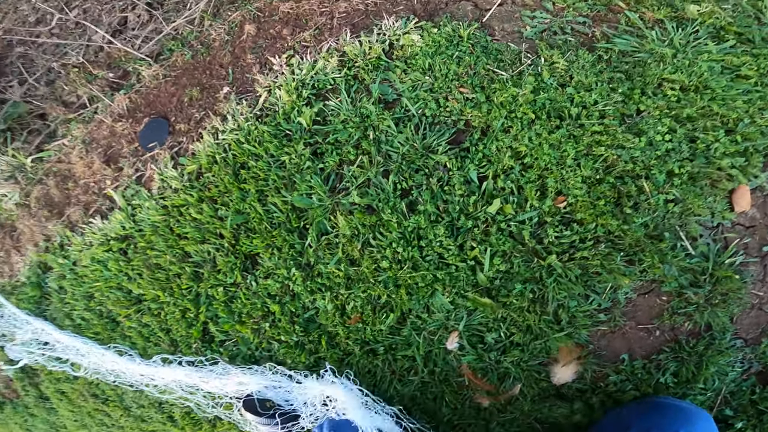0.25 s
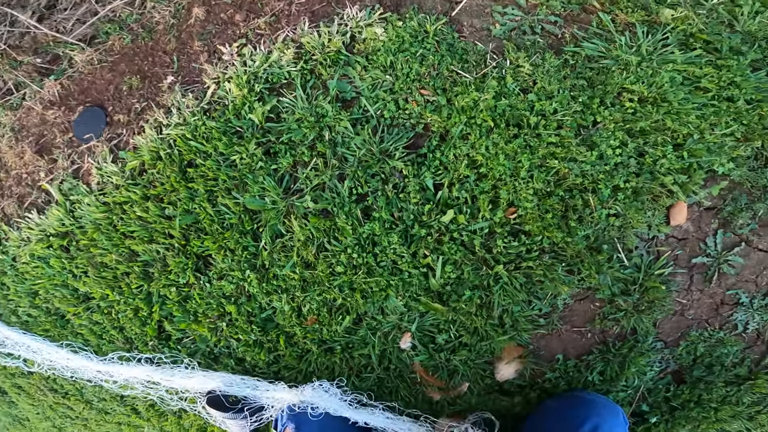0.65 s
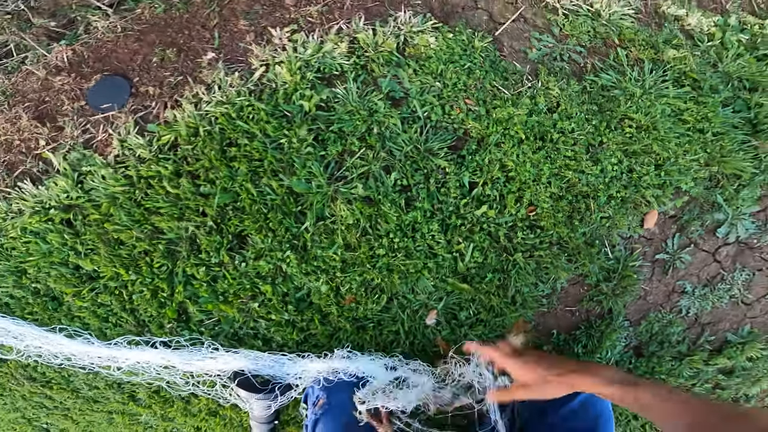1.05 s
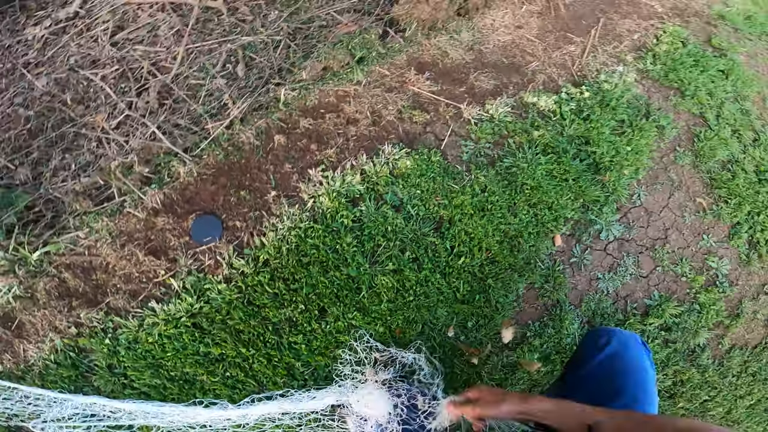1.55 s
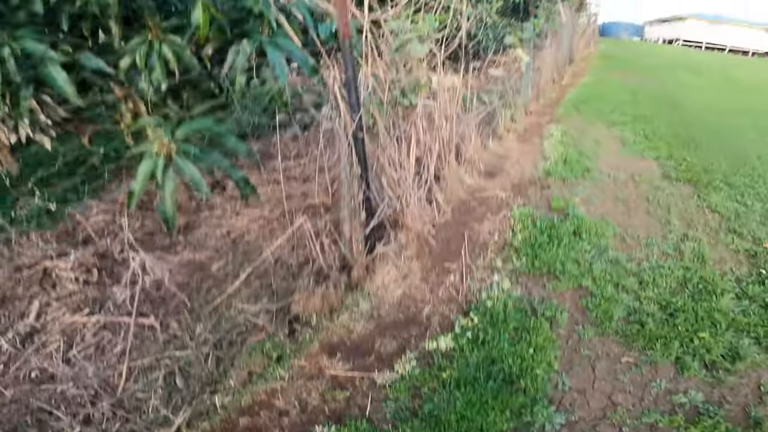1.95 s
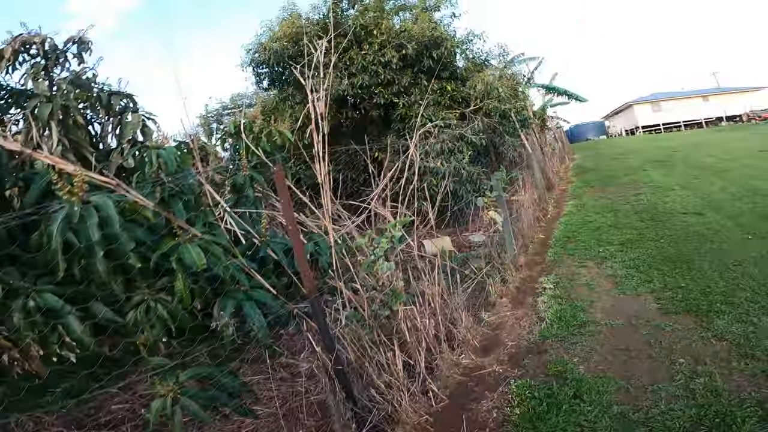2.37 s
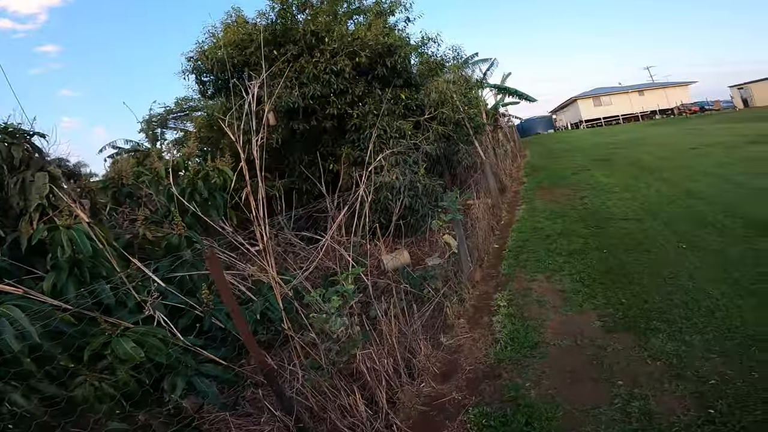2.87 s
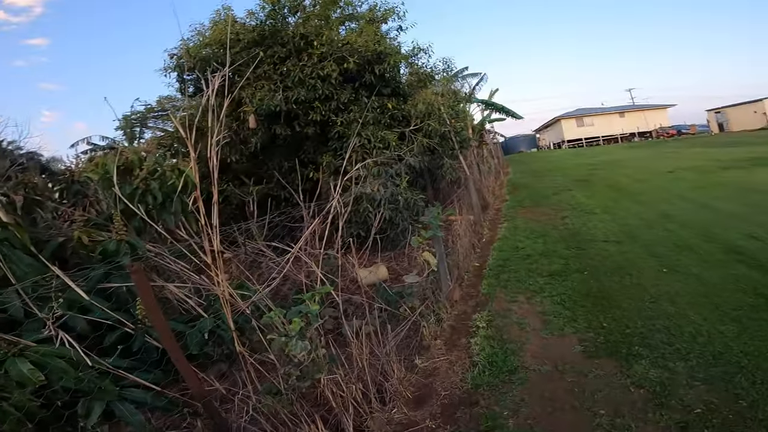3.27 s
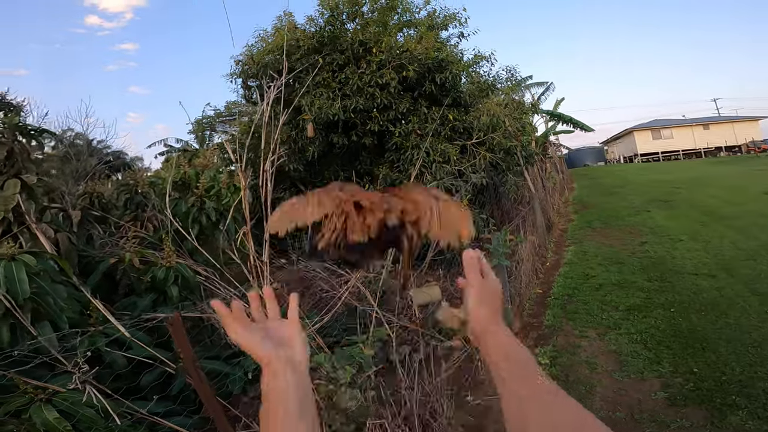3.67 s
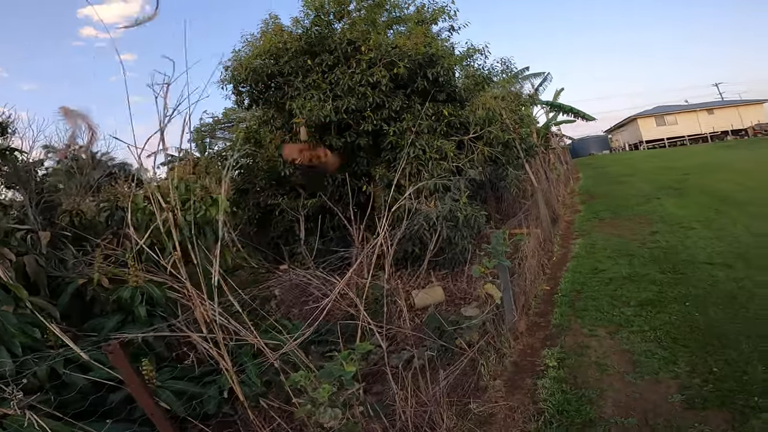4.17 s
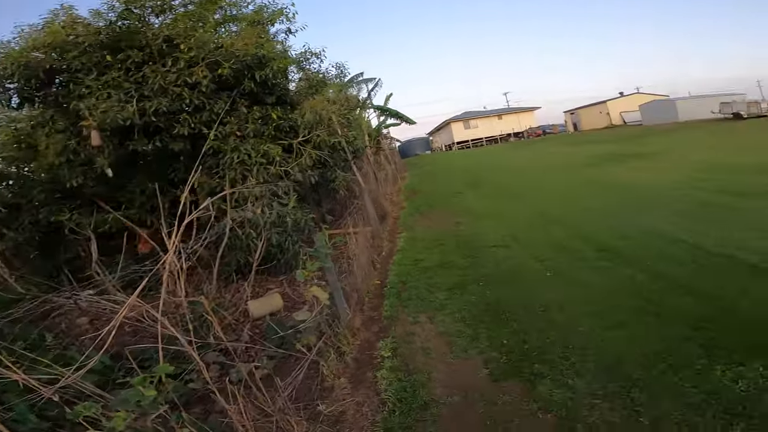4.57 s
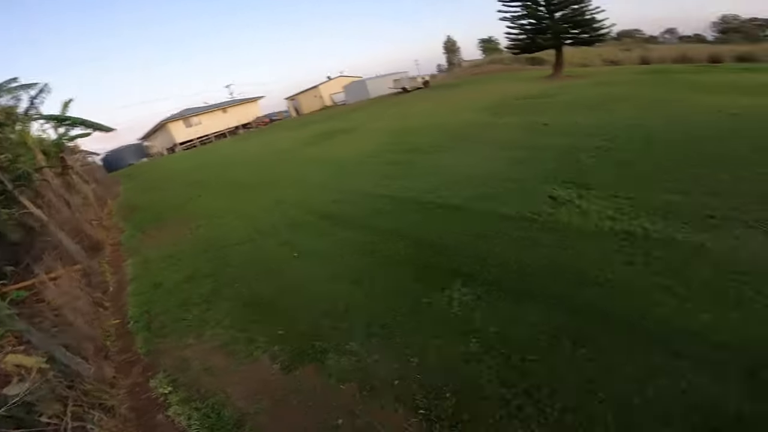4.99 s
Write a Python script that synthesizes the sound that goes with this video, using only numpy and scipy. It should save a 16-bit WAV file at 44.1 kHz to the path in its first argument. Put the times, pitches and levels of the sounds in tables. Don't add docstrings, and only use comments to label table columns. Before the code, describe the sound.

A hen held close squawks and shrieks up to a scream amid rustling and bumps, then is thrown, clucking off with snapping twigs and wingbeats.

```python
import sys
import numpy as np
from scipy import signal
from scipy.fft import rfft, irfft, next_fast_len
from scipy.io import wavfile
from scipy.ndimage import uniform_filter1d

SR = 44100
rng = np.random.default_rng(int(sys.argv[2]) if len(sys.argv) > 2 else 0)


def elevation(decibels):
    levels = np.asarray(decibels, float)
    return 10 ** (levels / 20)


def int16_out(signal):
    q = np.round(np.clip(np.atleast_2d(signal).T, -1, 1) * 32767)
    wavfile.write(sys.argv[1], SR, q.astype(np.int16))


N = 230907

# pitch_hz, level_db (per Hz)
AIR_COLOUR = [(90, -40), (150, -4), (760, -5.5), (1090, 1), (2700, -7), (3700, -9.5), (4400, -16.5),
              (8000, -21.5), (12500, -34.5), (16000, -54)]
# pitch_hz, level_db
MACHINE_WHINE = [(2229, -76), (2670, -70), (3117, -79), (3564, -64), (4011, -69)]
# pitch_hz, likeness (0-1)
PORT_LIKENESS = [(60, 1), (240, 0.98), (950, 0.83), (3770, 0.45), (15000, 0.1)]
# pitch_hz, left_right_db
PORT_LEVEL = [(60, -23), (180, -8), (550, -5.5), (1650, -2.5), (4970, -4), (15000, -19)]
# pitch_hz, lead_radians
PORT_LEAD_ANGLE = [(100, 0.071), (500, -0.054), (1200, -0.016), (2400, -1.09), (5000, -0.54), (10000, -1.1)]
# peak_s, level_db, upper_part_db (relative), rise_s, fall_s
GUSTS = [(0.08, -37.5, 6.5, 0.085, 0.17), (0.379, -45, -9, 0.17, 0.069), (0.951, -35.5, -4, 0.14, 0.029),
         (1.62, -61.5, -50, 0.69, 0.14), (2.02, -22.5, -15.5, 0.053, 0.094), (2.13, -36, -21, 0.063, 0.2),
         (2.3, -56, 5.5, 0.25, 0.052), (2.569, -39, -24, 0.049, 0.15), (3.134, -60.5, 13, 0.19, 0.024),
         (3.975, -32.5, -6, 0.096, 0.38), (4.526, -34, -22, 0.24, 0.78), (5.235, -46, -1, 0.48, 0.38)]
# peak_s, level_db, low_part_db (relative), rise_s, fall_s
RUBS = [(0.074, -43.5, 9, 0.074, 0.031), (0.298, -66, -3, 0.09, 0.32), (.61, -65, -26, 0.16, 0.15),
        (.87, -67, 23, 0.026, 0.052), (1.1, -64.5, -5, 0.11, 0.17), (1.76, -60.5, -22, 0.19, 0.11),
        (1.941, -65, -12, 0.05, 0.089), (3.47, -65.5, 8, 0.04, 0.064), (3.748, -51.5, -12.5, 0.11, 0.05),
        (3.888, -55.5, 12, 0.016, 0.6), (4.04, -48, -8, 0.12, 0.17), (4.25, -63, -1, 0.12, 1),
        (4.624, -49.5, 7, 0.011, 0.1), (4.902, -60.5, 10, 0.074, 0.18), (5.029, -41.5, -35, 0.015, 0.082),
        (5.145, -44.5, -5.5, 0.036, 0.16), (5.21, -60, -16, 0.15, .2)]
# pitch_hz, level_db (per Hz)
RUB_COLOUR = [(120, -31), (200, -7), (558, -18), (696, -20), (968, -15.5), (2420, -22), (3970, -20),
              (8740, -30), (12600, -43), (16000, -45.5)]

# time_s, effort_db, pitch_hz
HELD_SQUAWKS = [
    [(0.028, -33, 435), (0.05, -24, 477), (0.072, -12.5, 490.4), (0.08, -15.5, 604), (0.1, -15, 661),
     (0.115, -16, 757), (0.135, -27, 745)],
    [(0.128, -35, 713), (0.15, -24.5, 720.6), (0.178, -31, 718.6), (0.19, -21.5, 690), (0.21, -18.5, 595),
     (0.222, -13, 604), (0.258, -23, 587), (0.273, -17.5, 544), (0.284, -69, 577)],
    [(0.703, -28.5, 290.2), (0.76, -20, 487.5), (0.806, -18, 562), (0.92, -18, 599.4), (0.99, -18.5, 566.3),
     (1.014, -15, 522), (1.025, -21.5, 420), (1.04, -23, 390), (1.05, -50, 350)],
]
# time_s, effort_db, pitch_hz
HELD_SHRIEKS = [
    [(1.418, -27, 320), (1.445, -19.5, 397.5), (1.482, -17, 427.7), (1.488, -19, 615.7),
     (1.545, -16.5, 656), (1.551, -18.5, 764), (1.64, -19, 773), (1.644, -19.5, 398.5), (1.691, -24, 382)],
    [(2.183, -36.5, 244.5), (2.22, -24.5, 347.7), (2.245, -33, 387), (2.258, -28, 427.3),
     (2.33, -24.5, 468), (2.336, -23, 592.6), (2.39, -21.5, 670), (2.51, -24.5, 567.6), (2.55, -42, 481)],
    [(3.01, -27.5, 291), (3.03, -18.5, 356.5), (3.062, -14.5, 428), (3.075, -19.5, 532),
     (3.1, -20.5, 565.5), (3.129, -12.5, 586)],
]
# time_s, effort_db, pitch_hz
CLEAR_SCREAM = [
    (3.122, -21, 550.5),
    (3.17, -19, 576),
    (3.215, -20, 608),
    (3.255, -19, 610),
    (3.3, -20.5, 596.4),
    (3.342, -21.5, 590.5),
]
# time_s, effort_db, pitch_hz
BROKEN_RASP = [
    (3.333, -17.5, 596.5),
    (3.345, -17, 628),
    (3.368, -21.5, 619.7),
    (3.377, -15, 612),
    (3.384, -21.5, 598.6),
    (3.407, -18, 607),
    (3.416, -21.5, 570),
    (3.446, -21.5, 469),
    (3.465, -36.5, 430),
]
# time_s, effort_db, pitch_hz
THROWN_CRY = [
    (3.857, -31, 363),
    (3.905, -19.5, 381.5),
    (3.922, -20.5, 515),
    (3.945, -18, 466),
    (3.957, -25.5, 408),
    (3.978, -21, 507.5),
    (4.022, -18, 486),
    (4.055, -25.5, 507.5),
    (4.074, -40, 490),
]
# time_s, effort_db, pitch_hz
FLIGHT_CLUCKS = [
    [(4.08, -36, 483), (4.092, -22, 489), (4.127, -13.5, 562.4), (4.138, -20, 598), (4.156, -19, 511),
     (4.18, -42, 485)],
    [(4.224, -41, 370), (4.236, -29.5, 388.5), (4.255, -26, 492), (4.282, -25.5, 510), (4.297, -56, 497)],
    [(4.458, -39, 401), (4.478, -35.5, 455), (4.492, -22, 497), (4.512, -43, 495)],
    [(4.672, -51, 398), (4.688, -27, 453.6), (4.703, -21.5, 498), (4.72, -38, 492)],
    [(4.86, -57, 327), (4.878, -40, 476), (4.894, -18, 537), (4.9, -25.5, 548), (4.906, -25.5, 566),
     (4.93, -33.5, 470), (4.945, -44, 440)],
    [(4.98, -29, 419), (4.998, -34.5, 516.6), (5.008, -21.5, 554), (5.025, -26.5, 487), (5.037, -50, 470)],
]
# left_right_db, beak_hz, brightness_db, lower_windpipe_db, sizzle_db
CRY_PLACE = [(6.5, 1320, -20, 8.5, -28), (6, 1276, -14, 8.5, -3), (6, 1543, -7.5, 8, 2),
             (6, 1450, -14, 10, -3), (9.5, 1407, -10, 8, -5.5), (5, 1350, -6.5, 3, -5),
             (5, 1370, -2.5, 5.5, -1.5), (4.5, 1310, -10.5, 1.5, -4), (5.5, 1188, -18.5, -7, -21),
             (4.5, 1224, -17.5, -0.5, -3.5), (4.5, 1196, -14, -1, -17), (5.5, 1160, -13, -8, -5),
             (7, 1180, -16, -18, -5), (9, 1260, -22, -15, 9), (9, 1090, -24, -26, 24)]
# chest_db, whistle_db, beak_width_hz, hoarse_beak_ring (share), shut_beak_db
CRY_THROAT = [(-4, -14, 660, 0.47, -4), (-5, -5, 690, 0.74, -4.5), (-4.5, -20.5, 920, 1, -39),
              (-10, -12, 560, 0.84, -3), (-6.5, -6, 550, 0.76, -0.5), (-9, -3, 430, 1.2, -10),
              (-7.5, -7, 900, 1.8, 1.5), (-9.5, -1.5, 450, 0.65, 6.5), (-14, -3, 330, 0.31, -5),
              (-15, -11, 310, 0.23, -13), (-30, -6, 260, 0.3, -11), (-13, -9, 350, 0.39, 16),
              (-25, 0, 270, 0.2, 5), (-14, -3, 260, 0.43, -3), (-34, -10, 440, 0.33, -9)]
# start_s, end_s, roughness (0-1)
CLEAR_SPELLS = [(.04, .07, .2), (.07, .122, .5), (.186, .226, .45), (.226, .254, .04), (.254, .29, .55),
                (.7, .74, .25), (.74, .808, .45), (.808, 1.018, .12), (1.018, 1.05, .45), (1.41, 1.49, .48),
                (1.49, 1.546, .3), (1.546, 1.64, .5), (1.645, 1.7, .5), (2.18, 2.24, .3), (2.24, 2.33, .42),
                (2.34, 2.48, .48), (3.0, 3.062, .42), (2.48, 2.53, .4), (3.128, 3.15, .34),
                (3.15, 3.212, .2), (3.212, 3.25, .12), (3.25, 3.336, .01), (3.336, 3.47, .55),
                (3.062, 3.128, .55), (3.85, 3.92, .16), (3.92, 3.975, .25), (3.975, 4.035, .1),
                (4.075, 4.11, .18), (4.22, 4.25, .25), (4.11, 4.13, .45), (4.25, 4.875, .52),
                (4.875, 4.9, .28), (4.9, 5.1, .5)]
# start_s, end_s, share
PAIRED_SPELLS = [
    (.74, 1.0, .13),
    (1.49, 1.546, .22),
    (1.546, 1.64, .5),
    (2.34, 2.48, .32),
]
# pitch_hz, width_hz, level_db
LOWER_WINDPIPE = [(2487, 650, -6), (3072, 116, -5.5)]
# pitch_hz, width_hz, level_db
MAIN_WINDPIPE = [(3548, 685, 0.02)]
# pitch_hz, width_hz, level_db
SIZZLE_MODES = [(6420, 1830, -10.5), (9060, 330, -16.5), (10400, 1800, -27)]

# start_s, peak_db, pitch_hz
BODY_THUMPS = [
    (0.067, -19.5, 73.5),
    (0.072, -14, 193),
    (0.147, -23, 91),
    (0.152, -24.5, 241),
    (0.257, -24.5, 111.4),
    (0.88, -33.5, 200),
    (0.935, -30.5, 104),
    (4.54, -32, 58),
    (4.63, -33, 86),
]
# start_s, peak_db, pitch_hz
NET_TAPS = [
    (0.446, -43, 1180),
    (0.532, -39, 1426),
    (0.632, -36.5, 850),
    (1.938, -47, 467),
]
# time_s, level_db, pitch_hz
FAR_CALL = [
    (1.142, -52, 536),
    (1.316, -54.5, 525),
    (1.36, -102, 513),
]
# multiple_of_pitch, level_db
FAR_OVERTONES = [(1, 2), (2, 8), (3, 4.5), (4, -4), (5, 0), (6, 7.5)]
# start_s, peak_db, low_part_db (relative), tail_t60_s, left_right_db
QUILL_SNAPS = [(3.681, -58, 16, 0.12, -4), (3.775, -44, -8, 0.043, -7), (3.894, -20.5, 2.5, 0.22, -0.5),
               (3.908, -28, 3, 0.13, 1.5), (3.988, -39, -7, .07, -8), (4.025, -32, 2, 0.062, -2),
               (4.053, -41, 6, 0.054, -4), (4.092, -44, 3, .06, -2), (4.247, -39, 7, .06, -5),
               (4.438, -58, -1, 0.035, -1), (4.483, -43, -6, .05, 1), (4.456, -47, 0, 0.061, 3),
               (4.58, -42, -10, 0.054, 11), (4.607, -24.5, 1, 0.24, 8), (4.625, -41, 15.5, 0.047, 3),
               (4.651, -29, 9, 0.081, 9), (4.733, -39, 6.5, 0.25, 9), (4.825, -49, 4, .04, 5),
               (4.840, -41, 8.5, 0.22, 11), (4.890, -53, -6, 0.083, 10), (5.022, -29, -11, 0.3, 16),
               (5.135, -35, 5, 0.45, 22)]
# start_s, peak_db, pitch_hz
WING_BEATS = [
    (3.97, -24, 297),
    (4.08, -24, 295),
    (4.196, -32, 280),
    (4.243, -36, 324),
    (4.313, -32.5, 328),
]

HELD, FLYING = (-31.5, 0.18), (-22.5, 0.25)
USUAL_HZ, HOARSE, SLIDE_S = 600, 0.72, 0.007


def evened(x):
    return x / np.sqrt(np.mean(x ** 2) + 1e-20)


def steady(x, size=2200):
    return x / np.sqrt(uniform_filter1d(x ** 2, size=size, mode="reflect") + 1e-12)


def read(points, hz):
    f, value = np.transpose(points)
    return np.interp(np.log(hz + 1), np.log(f + 1), value)


def along(rows, t):
    s, *columns = np.transpose(rows)
    return [np.interp(t, s, column) for column in columns]


def add(mix, s, sound):
    part = mix[..., max(round(s * SR), 0):][..., :sound.shape[-1]]
    part += sound[..., :part.shape[-1]]


def band(x, lo_hz, hi_hz, order=2):
    return signal.sosfilt(signal.butter(order, [lo_hz, hi_hz], "bandpass", fs=SR, output="sos"), x)


def wander(count, hz):
    b, a = signal.butter(2, hz, fs=SR)
    return evened(signal.lfilter(b, a, rng.standard_normal(count + 2000))[2000:])


def swell(s, db, rise, fall):
    t = np.arange(N) / SR
    return elevation(db - 20 * np.maximum((s - t) / rise, (t - s) / fall))


def noise(colour, patchy_db, share):
    frames, hz = N // 128 + 5, np.fft.rfftfreq(512, 1 / SR)
    a, b, c, d, patches = rng.standard_normal((frames, 257, 5)).T
    patches = evened(uniform_filter1d(uniform_filter1d(patches, 8, 0), 10, 1))
    same = np.clip(share * read(PORT_LIKENESS, hz), -1, 1)[:, None]
    left = a + 1j * b
    right = same * left + np.sqrt(1 - same ** 2) * (c + 1j * d)
    z = np.array([left, right]) * elevation(read(colour, hz)[:, None] + patchy_db * patches)
    return evened(signal.istft(z, nperseg=512, noverlap=384)[1][:, :N])


def ports(x, pan_db):
    size = next_fast_len(len(x) + 256)
    hz = np.fft.rfftfreq(size, 1 / SR)
    half = elevation((read(PORT_LEVEL, hz) + pan_db) / 2) * np.exp(0.5j * read(PORT_LEAD_ANGLE, hz))
    return irfft(rfft(x, size) * np.array([half, 1 / half]), size)[:, :len(x)]


def distance():
    t = np.arange(N) / SR
    phase = np.array([[0], [2.0]])
    whine = sum(elevation(db + 2 + 3.5 * wander(N, 5)) * np.sin(2 * np.pi * hz * t + phase)
                for hz, db in MACHINE_WHINE)
    return elevation(-59) * noise(AIR_COLOUR, patchy_db=1.5, share=1.0) + whine


def wind():
    calm_db, calm_upper_db = -57, -7
    low = elevation(calm_db) + sum(swell(s, db, rise, fall) for s, db, _, rise, fall in GUSTS)
    high = elevation(calm_db + calm_upper_db)
    high = high + sum(swell(s, db + up_db, rise, fall) for s, db, up_db, rise, fall in GUSTS)
    a, b = rng.standard_normal((2, N))
    push = np.array([a + 0.75 * b, a - 0.75 * b]) * elevation(3.5 * wander(N, 15))
    upper = np.array([a + 0.18 * b, a - 0.18 * b]) * elevation(4.5 * wander(N, 30))
    return low * evened(band(push, 14.8, 63.0, order=4)) + high * evened(band(upper, 75.4, 240.0, order=4))


def rustle():
    high = sum(swell(s, db, rise, fall) for s, db, _, rise, fall in RUBS)
    low = sum(swell(s, db + low_db, rise, fall) for s, db, low_db, rise, fall in RUBS)
    slips = elevation(1.0 * wander(N, 520) + 2.0 * wander(N, 24))
    hiss = evened(noise(RUB_COLOUR, patchy_db=2.5, share=1.0) * slips)
    return elevation(12.5) * (low * band(hiss, 60, 1420, order=1) + high * band(hiss, 2140, 22000, order=1))


def resonate(x, hz, width):
    turn = np.exp(2j * np.pi * np.cumsum(hz * np.ones(len(x))) / SR)
    r = np.exp(-np.pi * width / SR)
    return 2 * (turn * signal.lfilter([1 - r], [1, -r], x / turn + 1e-18)).real


def twice(x, hz, width):
    return resonate(resonate(x, hz, width), hz, width)


def roughness(t):
    rough = np.full(len(t), HOARSE)
    for start, end, clear in CLEAR_SPELLS:
        rough = np.where((t >= start) & (t < end), clear, rough)
    return uniform_filter1d(rough, size=int(SLIDE_S * SR), mode="nearest")


def fray(count):
    span = int(0.018 * SR / 32)
    steps = rng.standard_normal((count // 16 + 1 + 2 * span, 58))
    steps = uniform_filter1d(uniform_filter1d(steps, size=span, axis=0), size=span, axis=0)[span:]
    return np.repeat(evened(steps), 16, axis=0)[:count].T.reshape(2, 29, count)


def voice(hz, rough, pairing):
    count = len(hz)
    slips = 0.002 * wander(count, 60)
    slips = slips + rough * (0.04 * wander(count, 50) + 0.07 * rough * wander(count, 300))
    turns = np.cumsum(hz * (1 + slips)) / SR
    flap = np.cos(2 * np.pi * turns / 3 + 0.9 * wander(count, 25))
    shifted = turns + 0.13 * rough ** 2 * flap + 0.05 * pairing * wander(count, 400)
    k = np.arange(1, 30)[:, None]
    fade, slip = rough * fray(count)
    level = elevation(3.5 * (1.5 + 1 / k) * fade) * (k * hz < SR / 2.8) / k ** 0.5
    overtones = level * np.cos(2 * np.pi * (k * shifted + 0.2 * (1 + 1 / k) * slip))
    pulses = evened(np.sum(overtones, axis=0))
    paired = 1 + pairing * np.cos(np.pi * turns + 1.2 * wander(count, 41.0))
    size = paired * (1 + 0.25 * rough * np.tanh(wander(count, 220)))
    size = size * (1 + (0.2 * rough + pairing) * flap)
    puffs = (0.075 + np.exp(-(turns % 1) / 0.5)) * rng.standard_normal(count)
    return size * (pulses + 0.4 * rough * evened(band(puffs, 150, 5000, order=1)))


def cry(rows, usual_beak_hz, usual_bright_db, pipe_db, sizzle_db,
        chest_db, whistle_db, width_hz, ring_share, close_db, lag):
    t = np.arange(rows[0][0], rows[-1][0], 1 / SR)
    effort_db, hz = along(rows, t)
    beak_hz = usual_beak_hz + hz - USUAL_HZ
    bright_db = usual_bright_db + 13.5 * np.log2(hz / USUAL_HZ) + lag * (effort_db.max() - effort_db)
    close_s = min(0.08, (t[-1] - t[0]) / 5)
    shut = np.clip(1 - np.minimum(t[-1] - t, 1.4 * (t - t[0])) / close_s, 0, 1)
    bright_db = bright_db + close_db * shut

    hz = uniform_filter1d(hz, size=int(SLIDE_S * SR), mode="nearest")
    rough = roughness(t)
    pairing = sum(share * (t > a) * (t < b) for a, b, share in PAIRED_SPELLS)
    drive = voice(hz, rough, np.maximum(0.4 * np.minimum(rough, 0.6), pairing))

    ring = ring_share * rough * steady(resonate(drive, beak_hz, 330))
    beak = steady(steady(twice(drive, beak_hz, width_hz)) + ring, size=400)
    chest = steady(twice(drive, 1.35 * hz, 1740))
    stretch = (beak_hz / 1350) ** 0.0083 * (1 + 0.035 * rough * wander(len(t), 30))
    whistle = [(4700, 290, whistle_db)]
    groups = ((LOWER_WINDPIPE, pipe_db), (MAIN_WINDPIPE, 0), (SIZZLE_MODES + whistle, sizzle_db))
    modes = [(f, w, db + group_db) for group, group_db in groups for f, w, db in group]
    pipe = steady(sum(elevation(db) * twice(drive, f * stretch, w) for f, w, db in modes), size=700)
    throat = elevation(chest_db - 11 * rough) * chest - beak + elevation(bright_db) * pipe
    edge = np.clip(np.minimum(t - t[0], t[-1] - t) / 0.007, 0, 1)
    return elevation(effort_db) * band(throat, 170, 8700) * edge


def yard(x):
    size = SR // 2
    taps = np.zeros((2, size))
    at = np.arange(300, size - 20, 20) + rng.integers(0, 20, (2, (size - 301) // 20))
    np.put_along_axis(taps, at, rng.choice([-1., 1.], at.shape), 1)
    tail = band(taps * elevation(-60 * np.arange(size) / SR / 0.35), 430, 4600)
    return signal.fftconvolve(x[None], tail / np.linalg.norm(tail[0]), axes=1)[:, :N]


def hen():
    direct, send = np.zeros((2, N)), np.zeros(N)
    held = HELD_SQUAWKS + HELD_SHRIEKS + [CLEAR_SCREAM, BROKEN_RASP]
    flight = [THROWN_CRY] + FLIGHT_CLUCKS
    postures = [HELD] * len(held) + [FLYING] * len(flight)
    for rows, (echo_db, lag), place, throat in zip(held + flight, postures, CRY_PLACE, CRY_THROAT):
        pan_db, *colour = place
        sound = cry(rows, *colour, *throat, lag)
        add(direct, rows[0][0], ports(sound, pan_db))
        add(send, rows[0][0], elevation(echo_db) * sound)
    return direct + yard(send)


def knocks(events, cycles, level_db):
    out = np.zeros(N)
    for s, db, hz in events:
        length = cycles * SR / hz
        u = np.arange(int(length)) / length
        swing = np.sin(2 * np.pi * cycles * (u - 0.041 * u ** 2))
        add(out, s, elevation(db + level_db) * np.sin(np.pi * u) ** 2 * swing)
    return out


def body_thumps():
    return knocks(BODY_THUMPS, cycles=1.2, level_db=7.0) * elevation(np.array([[-2.5], [1.5]]))


def net_taps():
    return knocks(NET_TAPS, cycles=2.8, level_db=-2.0)


def far_hen():
    t = np.arange(FAR_CALL[0][0], FAR_CALL[-1][0], 1 / SR)
    level_db, hz = along(FAR_CALL, t)
    turns = np.cumsum(hz * (1 + 0.023 * wander(len(t), 73))) / SR
    tones = sum(elevation(db + 3.2 * wander(len(t), 51)) * np.sin(2 * np.pi * k * turns) for k, db in FAR_OVERTONES)
    out = np.zeros((2, N))
    add(out, t[0], elevation(level_db) * evened(tones) * signal.windows.tukey(len(t), 0.2))
    return out


def snaps():
    out, t = np.zeros((2, N)), np.arange(5000) / SR
    for s, db, low_db, t60, pan_db in QUILL_SNAPS:
        grit = np.tanh(rng.standard_normal(5000))
        burst = grit * (elevation(-60 * t / 0.012) + 0.3 * elevation(-60 * t / t60))
        burst[:3] += [0.5, -0.8, 0.35]
        tick = band(band(burst, 1940, 6700), 260, 15000) + elevation(low_db) * band(burst, 620, 2800)
        add(out, s, elevation(db + 8) * ports(tick, pan_db))
    return out


def wing_beats():
    return knocks(WING_BEATS, cycles=6.2, level_db=1.5)


def scene():
    background = distance() + wind()
    handling = rustle() + body_thumps() + net_taps()
    return background + handling + hen() + far_hen() + snaps() + wing_beats()


def top_cut(x):
    return signal.sosfilt(signal.butter(12, 16360, fs=SR, output="sos"), x)


def record(dry):
    ceiling = 0.62
    limited = ceiling * np.tanh(dry / ceiling)
    treble_cut = signal.butter(12, 15950, fs=SR, output="sos")
    return top_cut(signal.sosfilt(treble_cut, limited))


dry = scene()
out = record(dry)
int16_out(out)
```